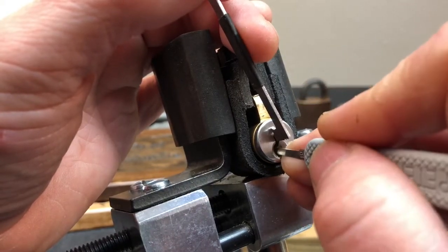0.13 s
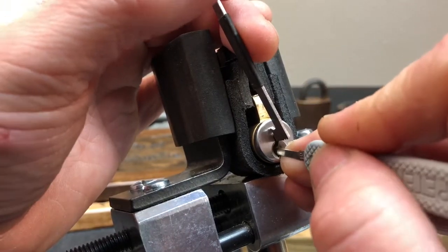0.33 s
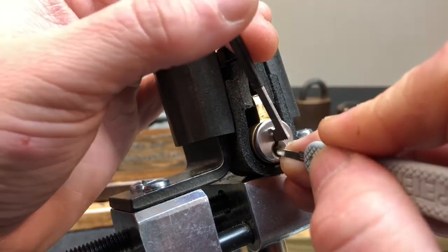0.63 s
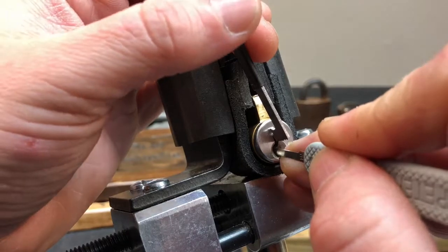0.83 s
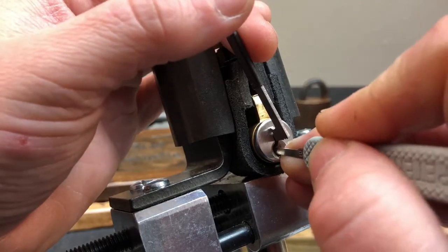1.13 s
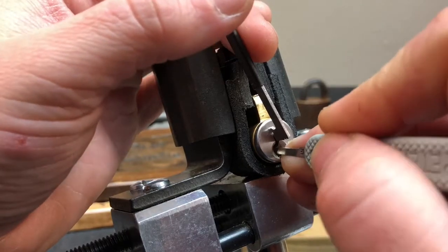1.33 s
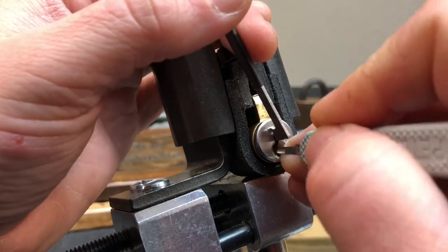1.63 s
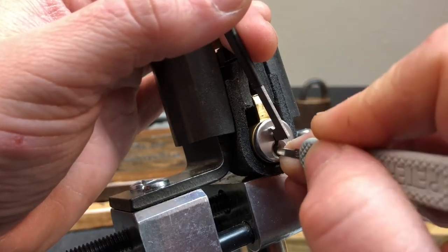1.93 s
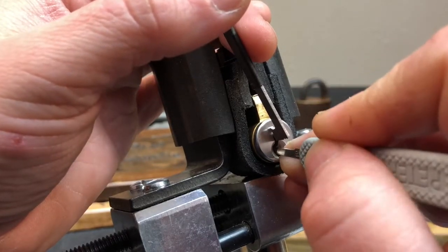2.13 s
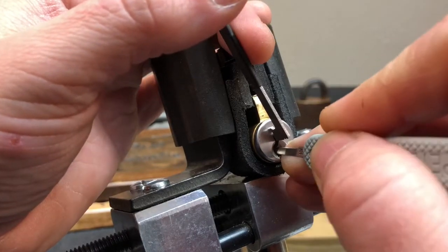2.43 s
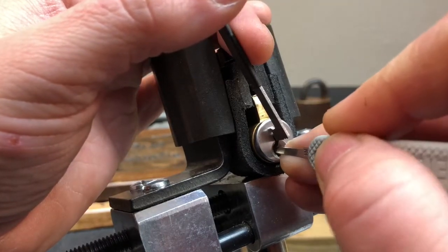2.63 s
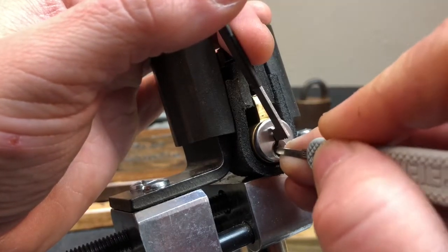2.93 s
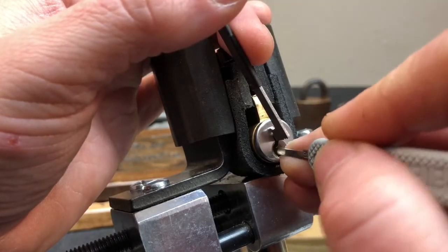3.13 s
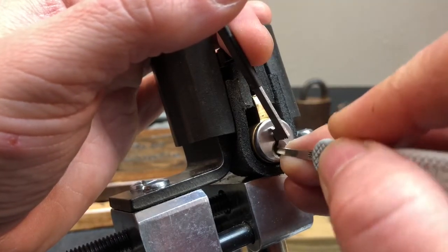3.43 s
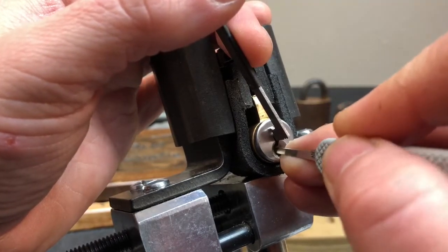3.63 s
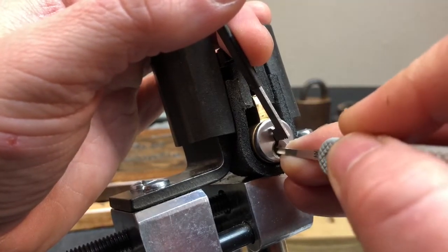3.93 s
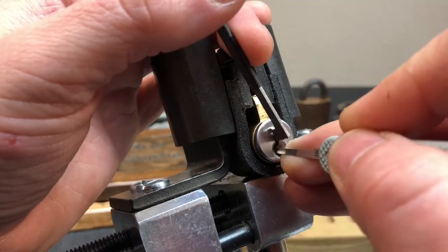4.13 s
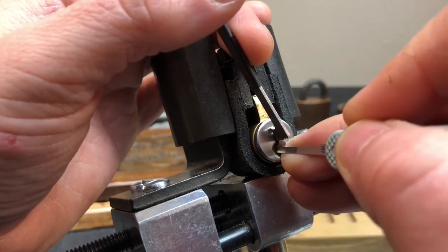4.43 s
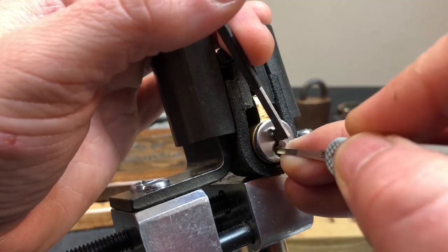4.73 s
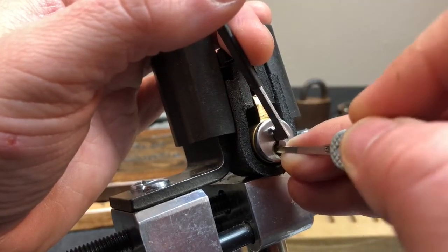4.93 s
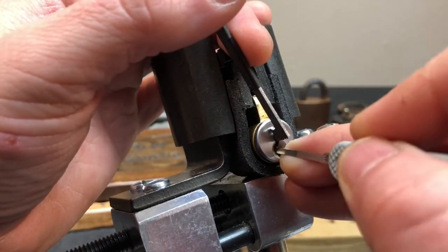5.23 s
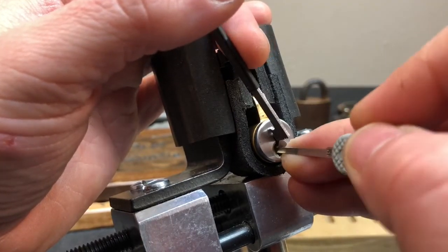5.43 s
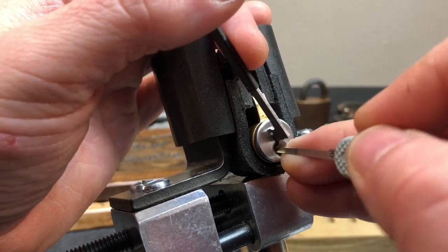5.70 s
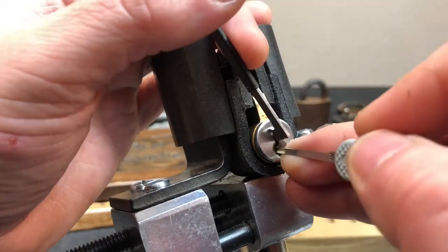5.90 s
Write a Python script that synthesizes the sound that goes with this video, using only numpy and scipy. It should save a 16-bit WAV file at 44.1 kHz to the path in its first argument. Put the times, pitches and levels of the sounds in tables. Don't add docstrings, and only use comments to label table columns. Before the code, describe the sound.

In a hushed, lightly hissing room, a lock pick scrapes and clicks delicately on pins; one sharp snap thumps the bench, then sparse probing continues.

```python
import sys
import numpy as np
from scipy import signal
from scipy.fft import rfft, irfft, next_fast_len
from scipy.io import wavfile
from scipy.ndimage import map_coordinates

SR = 44100
rng = np.random.default_rng(int(sys.argv[2]) if len(sys.argv) > 2 else 0)


def log_audio(samples):
    frames = np.atleast_2d(samples).T
    limited = np.clip(frames, -1, 1)
    pcm = np.round(limited * 32767).astype(np.int16)
    wavfile.write(sys.argv[1], SR, pcm)


def nominal_scale(level):
    x = np.asarray(level, float) / 20
    return 10 ** x


N = 267422

# start in seconds, peak of the blade in dB, level of the jolt in dB.
HARD_PUSHES = [(1.6134, -79, -73), (1.6182, -63.5, -57.5), (1.7458, -73, -72), (1.945, -45.5, -40.5),
               (1.9664, -59.5, -53), (2.6248, -79, -64), (2.6395, -66, -68), (2.674, -84, -71.5),
               (2.772, -46, -55.5), (3.2429, -77, -65.5), (3.247, -60, -65.5), (3.2637, -63, -66.5),
               (3.6096, -73.5, -76), (3.9474, -76, -72), (4.6055, -67, -60.5), (4.6302, -86, -69),
               (4.9284, -71, -77.5), (5.113, -59.5, -78.5), (5.1264, -65.5, -62.5), (5.4047, -75, -73),
               (6.0156, -70, -77), (6.0262, -81, -75)]


def unit(x):
    return x / np.sqrt(np.mean(x ** 2) + 1e-20)


def along(points, hz):
    f, v = np.transpose(points)
    return np.interp(np.log(hz + 1), np.log(f + 1), v)


def level_over_time(points):
    return np.interp(np.arange(N) / SR, *np.transpose(points))


def wobble(rate):
    knots = rng.standard_normal(int(N * rate / SR) + 4)
    return map_coordinates(knots, [np.arange(N) * rate / SR])


def add(track, s, sound):
    part = track[max(round(s * SR), 0):][:len(sound)]
    part += sound[:len(part)]


def ring(hz, db, t60, attack):
    t = np.arange(SR // 2) / SR
    rise = (1 - np.exp(-t / attack)) ** 2
    return nominal_scale(db - 60 * t / max(t60, .005)) * rise * np.sin(2 * np.pi * hz * t)


def push(ms, spike):
    t = np.arange(1024) / SR
    length = max(ms, .3) / 1000
    rise = 1 - np.exp(-t / (0.13 * length))
    main_press = np.exp(-(t / (1.25 * length)) ** 2)
    chatter = .13 * np.exp(-t / .0024)
    roughness = rng.standard_normal(len(t)) * nominal_scale(4 * rng.standard_normal(len(t)))
    force = rise * (main_press + chatter) * roughness
    force[round(.2 * length * SR)] += spike * np.linalg.norm(force)
    return force


def struck(force, modes, scatter_db):
    f = np.fft.rfftfreq(len(force), 1 / SR)
    gains = nominal_scale(scatter_db * rng.standard_normal(len(modes)))
    body = 0
    for k, (hz, width, db) in enumerate(modes):
        resonance = 1j * f * width / (hz * hz - f * f + 1j * f * width)
        body = body + (-1) ** k * gains[k] * nominal_scale(db) * resonance
    low_hz, high_hz = modes[0][0], 1.47 * modes[-1][0]
    low_cut = (f / low_hz) ** 2 / (1 + (f / low_hz) ** 2)
    high_cut = 1 / (1 + (f / high_hz) ** 4)
    sound = irfft(rfft(force) * body * low_cut * high_cut, len(force))
    return sound / np.linalg.norm(sound)


def air():
    # frequency in Hz, level in dB per Hz.
    noise_colour = [(12, -54.5), (28, -18.5), (61, -5.5), (112, -2), (185, -4), (207, -5.5), (232, -2),
                    (266, -8.5), (342, -9), (491, -16), (811, -20.5), (2150, -26.5), (2470, -27),
                    (15500, -33.5)]
    # time in seconds, level in dB.
    rumble_level = [
        (0.0, -73),
        (0.27, -68),
        (0.39, -72),
        (1.86, -70.5),
        (2.18, -67.5),
        (2.45, -71.5),
        (4.27, -70),
        (4.42, -70.5),
        (6.06, -70.5),
    ]
    hiss_top_hz, hiss_db = 15950, -75.5
    lift_db, lump_db = 1.5, 1.26
    m = next_fast_len(N)
    hz = np.fft.rfftfreq(m, 1 / SR)
    low = 1 / (1 + (hz / 900) ** 2)
    colour = nominal_scale(along(noise_colour, np.minimum(hz, 15000)) - 21 * (hz > hiss_top_hz))

    def noise(share):
        return unit(irfft(rfft(rng.standard_normal(m)) * colour * np.sqrt(share), m)[:N])

    rumble_db = level_over_time(rumble_level) + lift_db + lump_db * wobble(rate=9)
    return nominal_scale(rumble_db) * noise(low) + nominal_scale(hiss_db) * noise(1 - low)


def room(x):
    # frequency in Hz, time to fall by 60 dB in seconds, level of the answer in dB.
    walls = [(299, .25, -15), (2000, .13, -20), (5000, .11, -27), (11000, .12, -28), (15000, .1, -29.5)]
    hz, t, z = signal.stft(rng.standard_normal(SR // 2), SR, nperseg=128)
    t60 = along([(f, die_s) for f, die_s, _ in walls], hz)[:, None]
    db = along([(f, level) for f, _, level in walls], hz)[:, None]
    fading = nominal_scale(db - 60 * t / t60) / np.sqrt(t60 * SR / 14)
    tail = signal.istft(z * fading, SR, nperseg=128)[1]
    delayed = np.pad(x, (90, 0))
    return signal.fftconvolve(delayed, tail)[:N]


def handling():
    # time in seconds, level in dB.
    grip = [
        (0, -81.5),
        (1.2, -82.5),
        (1.6, -72.5),
        (2.1, -81.5),
        (2.65, -78),
        (3.4, -79.5),
        (4.4, -82),
        (5, -75.5),
        (6.06, -84),
    ]
    # frequency in Hz, width in Hz, level in dB.
    jaws = [(333, 110, -2), (500, 110, 0), (760, 300, -9.5)]
    rub = nominal_scale(6.0 * wobble(rate=14)) * rng.standard_normal(N)
    return nominal_scale(level_over_time(grip)) * unit(struck(rub, jaws, .1))


def bench():
    # start in seconds, level in dB.
    thumps = [
        (1.943, -33.5),
    ]
    # frequency in Hz, level in dB, time to fall by 60 dB in seconds, rise in seconds.
    board_hz, board_db, board_t60, board_rise = (210, 3, .11, 0.007)
    # frequency in Hz, width in Hz, level in dB, time to fall by 60 dB in seconds.
    low_bands = [(110, 50, -17, .25), (174, 57, -16.5, 0.61), (334, 60, -8.5, .1)]
    out = np.zeros(N)
    t = np.arange(SR // 2) / SR
    f = np.fft.rfftfreq(SR // 2, 1 / SR)
    for s, db in thumps:
        add(out, s + 0.01, ring(board_hz, db + board_db, board_t60, board_rise))
        for hz, width, level, t60 in low_bands:
            shape = np.exp(-((f - hz) / width) ** 2)
            band = unit(irfft(rfft(rng.standard_normal(len(t))) * shape, len(t)))
            swell = 1 - np.exp(-(t * hz / 3) ** 2)
            add(out, s, nominal_scale(db + level - 60 * t / t60) * swell * band)
    return out


def vise_knocks():
    # start in seconds, peak in dB, frequency in Hz.
    knocks = [(0.242, -58.5, 480), (1.623, -57, 479), (1.734, -61, 500), (1.744, -53.5, 474),
              (1.838, -65, 494), (1.949, -28, 461), (2.232, -71, 544), (2.63, -55, 499), (2.645, -61, 522),
              (2.682, -60.5, 467), (2.775, -56.5, 544), (3.078, -68, 482), (3.248, -57, 478),
              (3.264, -65, 538), (3.606, -59, 534), (3.849, -62, 465), (3.95, -65.5, 470),
              (4.396, -68, 415), (4.424, -65.5, 468), (4.61, -56.5, 490), (4.918, -66.5, 514),
              (5.118, -52, 503), (5.131, -53.5, 487), (5.403, -67, 455), (5.421, -68.5, 514),
              (6.019, -71, 518)]
    usual_t60_s, usual_db, harder_dies = .047, -53.5, .26
    out = np.zeros(N)
    for s, db, hz in knocks:
        t60 = usual_t60_s * nominal_scale(-harder_dies * (db - usual_db))
        main = ring(hz, db + 9.0, t60, 0.0022)
        twin = ring(hz * 1.09, db + 2.0, 1.1 * t60, 0.004)
        deep = ring(hz * 0.652, db - 0.5, t60, 0.0021)
        add(out, s, main + twin + deep)
    return out


def shell_jolts():
    # frequency in Hz, width in Hz, level in dB.
    shell_modes = [(800, 250, 3.5), (1165, 157, 4), (1500, 400, -5), (2010, 434, -0.5), (2550, 720, -7.5)]
    out = np.zeros(N)
    for s, _, jolt_db in HARD_PUSHES:
        force = push(ms=3.24, spike=.9)
        add(out, s, nominal_scale(jolt_db + 22) * struck(force, shell_modes, 1.3))
    return out


def wrench():
    # frequency in Hz, level in dB, seconds until the finger has damped it by 30 dB.
    blade_modes = [(1604, -8, .024), (1950, -12, .018), (1820, 0, .034)]
    out = np.zeros(N)
    t = np.arange(SR // 2) / SR
    for s, db, _ in HARD_PUSHES:
        for hz, level, life in blade_modes:
            smother = nominal_scale(-30 * (t / life) ** 3)
            add(out, s, ring(hz, db + level - 2.5, 0.1616, 0.0009) * smother)
    return out


def catches():
    # start in seconds, length in ms, spring level in dB, plug level in dB relative to the springs.
    strokes = [(1.583, 1.5, -74, -5), (1.6256, 3, -76, 1.5), (1.7592, 14, -66.5, -2.5),
               (1.9335, 1.5, -70.5, -18), (2.633, 14, -67, -1), (2.669, 14, -67, 5),
               (2.7753, 5, -62.5, 2.5), (3.244, 16, -75, 14), (2.649, 19, -74, -1), (3.311, 6, -77, -4),
               (4.433, 1.5, -75, -3), (3.3972, 1.5, -69.5, 0.5), (3.46, 1.5, -79, -8.5),
               (3.577, 1.5, -72.5, -8), (3.596, 11, -72, -3), (3.619, 1.5, -74, 0), (3.809, 5, -80, 3.5),
               (3.9473, 1.5, -74.5, 2.5), (4.301, 4, -75, -9), (4.4225, 1.5, -78, 5.5),
               (4.5035, 1.5, -79.5, 0), (4.606, 6, -66.5, 0), (4.6305, 6, -78.5, 1), (4.913, 10, -69.5, 0),
               (4.931, 7, -74, -1.5), (5.135, 7.3, -71, -2), (5.411, 2.5, -71, 1.5), (5.4316, 4, -79.5, -4),
               (5.5459, 3, -69, -9.5), (6.0148, 19, -71, 2)]
    gap_ms, contact_ms, spread_db = 2.4, 1.1, 4
    usual_pin_db, spot_hz = -3, 12300
    rows = []
    k = np.arange(10)
    for s, length_ms, db, plug_db in strokes:
        late, size, contact, pin, plug = rng.standard_normal((5, len(k)))
        at_ms = gap_ms * (k + .25 * late * (k > 0))
        level = db + spread_db * size - 15 * np.maximum(at_ms - length_ms, 0)
        touch_ms = contact_ms * np.exp(.45 * contact)
        rows += zip(s + at_ms / 1000, touch_ms, level, usual_pin_db + 3 * pin, plug_db + 3 * plug)
    return [(*row, spot_hz) for row in rows]


def pins():
    # frequency in Hz, width in Hz, level in dB.
    spring_modes = [(9530, 580, 1), (11600, 1600, 0), (13000, 480, -3.5), (13500, 1100, 0),
                    (14600, 270, -4)]
    pin_modes = [(6790, 450, 2.5), (8200, 1200, 0), (8420, 740, -5)]
    plug_modes = [(3260, 1000, -2.5), (4500, 900, -2.5), (5306, 1210, -2)]
    # start in seconds, spring level in dB, pin level and plug level in dB relative to the springs,
    # favoured spring region in Hz.
    clicks = [(1.6133, -44, -18, -10, 13560), (1.9528, -24.5, -10, -13, 13000),
              (1.9654, -25.5, -11.5, -23.5, 12800), (2.6302, -58, 3, 0, 11200),
              (2.674, -52.5, 0, -1, 11600), (2.687, -56.5, -2, -1, 11830), (2.773, -67, 1, -19, 12600),
              (2.7793, -49.5, -7, -18, 13410), (3.249, -45, -8, -9, 12410), (3.26, -55.5, -9, -8, 12900),
              (3.2678, -54.5, 1.5, -8, 14900), (3.2718, -52, 2, -3, 12500), (3.6125, -62, -1, 0, 13200),
              (4.303, -49, -10, -23.5, 11400), (4.6061, -52, -1.5, -6.5, 11900),
              (5.1272, -45.5, 1, 8.5, 12100), (5.4054, -39.5, -17.5, -22.5, 15400),
              (6.0165, -61, -0.6, -5, 11130), (6.026, -61, 1, -7, 9900), (6.0294, -53.5, -1, -1.5, 12500)]
    skids = [(1.5745, -63.5, -14, -5, 12800), (1.619, -48.5, -6, -9, 14750), (1.6215, -58, -7, -13, 14500),
             (1.7447, -57.5, -2, -9, 13000), (1.7682, -52.5, -16, -7, 11530),
             (1.9217, -60, -16, -19, 12900), (1.978, -52, -11, -5, 12110),
             (2.6263, -57.5, -15.5, -3.5, 13800), (2.7711, -51, 1, 0, 12300),
             (3.2639, -47, -14.5, -4.5, 12500), (3.2679, -53.5, -2, -3.5, 13800),
             (3.2775, -59, -9, 3, 12000), (3.601, -53.5, -2.5, -2.5, 13500),
             (3.6098, -52.5, -9.5, 2, 13000), (5.134, -65, -8, 1.5, 11850), (6.0214, -57, 3.5, -3.5, 11600),
             (4.9287, -67, 4, 1.5, 13400), (5.1617, -76, -3, 9, 12300), (5.1126, -77, -4, -5, 12300),
             (2.6929, -74, 5, -1.5, 12300), (3.3488, -81, 7, 1, 12300), (1.752, -64, -9, -6, 12100)]
    click_ms, skid_ms = .42, 1.2
    contacts = [(s, click_ms, *rest) for s, *rest in clicks]
    contacts += [(s, skid_ms, *rest) for s, *rest in skids]
    out = np.zeros(N)
    for s, ms, db, pin_db, plug_db, spot_hz in contacts + catches():
        force = push(ms, spike=1.1 * (db > -58))
        favoured = [(hz, width, level - 5 * ((hz - spot_hz) / 1900) ** 2) for hz, width, level in spring_modes]
        parts = struck(force, favoured, 2.19)
        parts = parts - nominal_scale(pin_db) * struck(force, pin_modes, 1.8)
        parts = parts + nominal_scale(plug_db) * struck(force, plug_modes, 1.8)
        longer_is_stronger = np.sqrt(ms * SR / 1000 + 16)
        add(out, s - .0002, nominal_scale(db) * longer_is_stronger * parts)
    return out


def snap():
    # start in seconds, level in dB, contact time in ms.
    slips = [
        (1.9450, -10, 0.18),
        (1.9445, -9, 0.26),
        (1.9457, 1, 0.26),
        (1.9461, -17.5, 0.27),
        (1.946, -13.5, 0.99),
    ]
    # frequency in Hz, width in Hz, level in dB.
    driver_modes = [(3430, 498, -14.5), (4272, 900, -16), (5890, 320, -13.5), (6600, 950, -10),
                    (7800, 730, -13.5), (9350, 390, -12.5), (10270, 721, -8), (12000, 1500, -2),
                    (13800, 700, -3.5), (15500, 500, -7)]
    shiver_modes = [(900, 280, -1.5), (2250, 1000, -1.5), (4070, 3200, -5.5), (6960, 1400, -2),
                    (10700, 1500, -2), (13800, 1320, -3)]
    out = np.zeros(N)
    t = np.arange(SR // 4) / SR
    for s, db, ms in slips:
        add(out, s, nominal_scale(db + 4.5) * struck(push(ms, spike=3), driver_modes, 0.785))
    fading = nominal_scale(-60 * t / .21) + .6 * nominal_scale(-60 * t / .05)
    shiver = struck(fading * rng.standard_normal(len(t)), shiver_modes, 0.0971)
    add(out, slips[-1][0], nominal_scale(-17.0) * shiver)
    return out


def scene():
    lock = pins() + snap() + vise_knocks() + shell_jolts()
    mix = lock + wrench() + bench() + room(lock) + air() + handling()
    return mix[None]


def top_cut(x):
    return signal.sosfilt(signal.butter(12, 17170, fs=SR, output="sos"), x)


def record(dry):
    top_hz = 16250
    m = next_fast_len(N)
    hz = np.fft.rfftfreq(m, 1 / SR)
    microphone = 1 / np.sqrt(1 + (hz / top_hz) ** 60)
    heard = irfft(rfft(dry, m) * microphone, m)[:, :N]
    return top_cut(heard)


dry = scene()
out = record(dry)
log_audio(out)
```